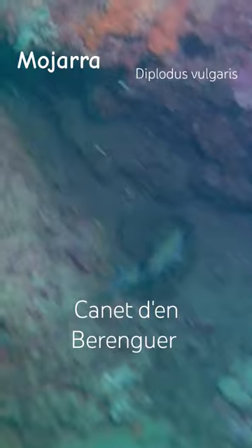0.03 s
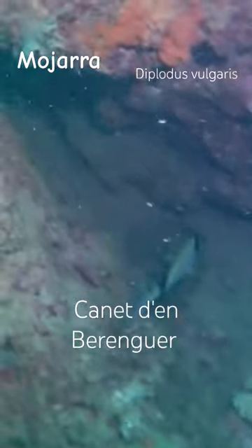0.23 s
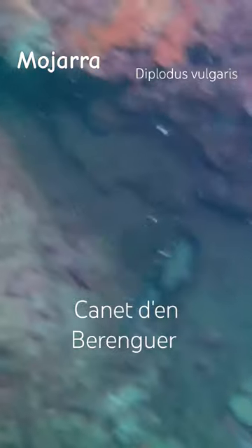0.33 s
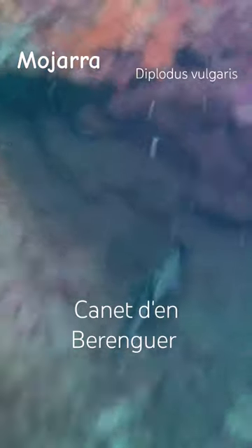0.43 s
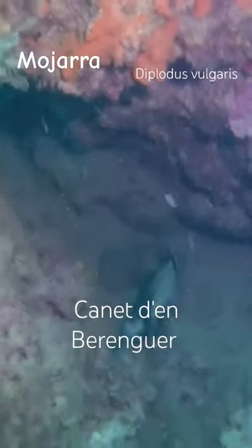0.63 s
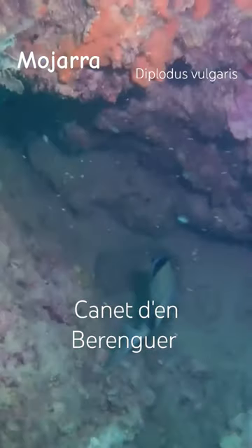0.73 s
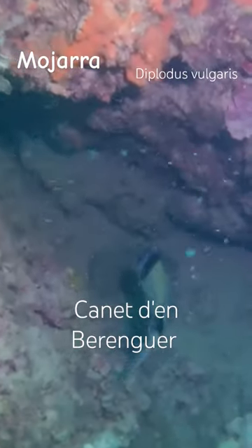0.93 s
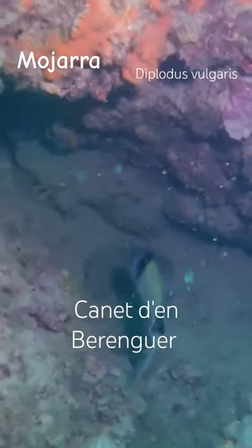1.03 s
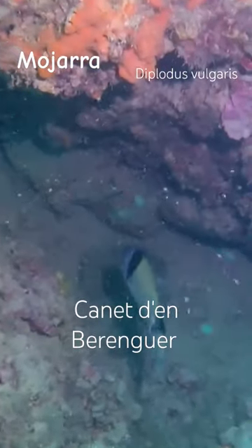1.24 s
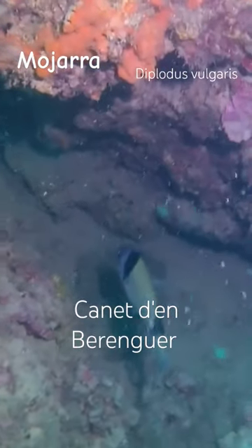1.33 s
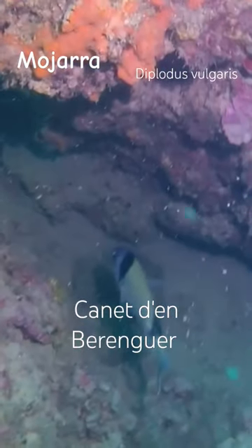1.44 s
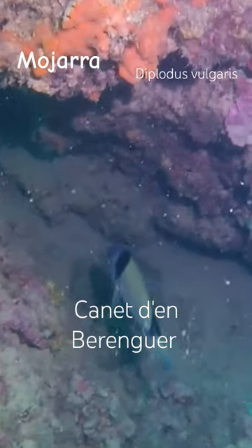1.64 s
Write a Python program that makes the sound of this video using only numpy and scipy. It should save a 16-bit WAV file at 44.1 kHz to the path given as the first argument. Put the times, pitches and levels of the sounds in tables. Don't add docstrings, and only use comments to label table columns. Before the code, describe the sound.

Muffled underwater rumble heard from inside a sealed camera housing: brief silence, a small click, strong deep wobbling hum that fades, steady water flow, then gurgles, ticks, soft bumps and faint reef crackles.

```python
import sys
import numpy as np
from scipy import signal
from scipy.fft import rfft, irfft
from scipy.io import wavfile
from scipy.ndimage import uniform_filter1d

SR = 44100
rng = np.random.default_rng(int(sys.argv[2]) if len(sys.argv) > 2 else 0)


def linear_from_db(decibels):
    return 10 ** (np.asarray(decibels, float) / 20)


def bounce(signal):
    frames = np.transpose(np.atleast_2d(signal))
    limited = np.clip(frames, -1, 1)
    pcm = np.round(limited * 32767).astype(np.int16)
    wavfile.write(sys.argv[1], SR, pcm)


N = 74970
START_S = .18362
CRACKLE_BAND_HZ = (5300, 12500)


def wobble():
    # time in seconds, level in dB.
    wobble_level = [(.185, -19), (.21, -13.5), (.3, -18), (.39, -19), (.425, -31.5), (.46, -19.5),
                    (.5, -10.5), (.55, -17.5), (.6, -13.5), (.66, -18.5), (.73, -27), (.9, -32),
                    (1.04, -42.5), (1.1, -35), (1.42, -42), (1.55, -31.5), (1.65, -40), (1.7, -33.5)]
    # time in seconds, wobble speed in Hz.
    wobble_speed = [(.18, 72), (.2, 33.5), (.21, 28.5), (.23, 29.5), (.39, 29.7), (.41, 36), (.455, 38),
                    (.48, 24), (.51, 23), (.535, 27), (.57, 30.3), (.8, 29.7), (1.7, 29.5)]
    t = np.arange(N) / SR
    moving = t > START_S + .0012
    turns = np.cumsum(along(wobble_speed, t) * moving) / SR
    return np.sqrt(2) * linear_from_db(along(wobble_level, t)) * np.sin(2 * np.pi * turns)


def bumps():
    # time of the peak in seconds, peak in dB, width in seconds (negative for a pull).
    bump_rows = [
        (0.5797, -21, -.0007),
        (.5812, -25, .0008),
        (.584, -28, -.001),
        (0.5873, -23, .0007),
        (1.3872, -22, .0015),
        (1.4104, -13.5, .0011),
        (1.2, -26, -.003),
    ]
    out, t = np.zeros(N), np.arange(N) / SR
    for s, db, width in bump_rows:
        u = (t - s) / width
        sharpness = np.where(u < 0, 3., 1.)
        out += np.sign(width) * linear_from_db(db) * np.exp(-sharpness * u ** 2)
    return out


def low_rings():
    # start in seconds, peak in dB, pitch in Hz, twice the time to fade by 30 dB in seconds.
    ring_rows = [
        (0.191, -37, 131, 0.19),
        (0.5751, -26, 185, 0.05),
        (1.042, -40.5, 149.7, 0.35),
        (1.14, -35.5, 175, 0.16),
        (1.228, -30, 135, 0.059),
        (1.291, -39, 160.2, 1),
        (1.383, -45, 175.7, 0.58),
        (1.403, -25.5, 315, 0.046),
        (1.57, -42.5, 122, 0.57),
        (1.61, -35.5, 275.4, 0.22),
    ]
    out = np.zeros(N)
    for s, db, hz, t60 in ring_rows:
        add(out, s, ring(db, hz, t60 / 2, rise_s=0.01, glide=0.011, rough=0.32, hold=1.45))
    return out


def gurgles():
    # start in seconds, peak in dB, pitch in Hz, length in seconds.
    gurgle_rows = [(0.217, -34, 732, 0.015), (0.264, -36.5, 753, 0.033), (.512, -34, 714, 0.012),
                   (.584, -24.5, 680, 0.0095), (0.606, -35.5, 775, 0.013), (0.779, -28, 750, 0.032),
                   (0.797, -21.5, 750, 0.023), (0.968, -39.5, 753, .025), (1.382, -31, 645, 0.012),
                   (1.413, -31, 750, 0.014), (1.426, -24, 724, 0.014), (1.437, -27, 847, 0.011),
                   (1.4905, -23, 778, 0.017), (1.506, -30.5, 830, 0.047), (1.604, -31, 820, 0.0086),
                   (1.666, -39, 744, 0.017), (1.682, -37, 778, 0.028), (0.718, -49, 1570, 0.0072)]
    out = np.zeros(N)
    for s, db, hz, length in gurgle_rows:
        add(out, s, ring(db, hz, length, rise_s=0.0017, glide=0.019, rough=0.2, hold=2.28))
    return out


def rising_bubbles():
    # start in seconds, peak in dB, pitch in Hz, length in seconds, glide as a share of pitch.
    bubble_rows = [(1.4385, -35.5, 1150, 0.021, .09), (1.502, -45, 1420, .036, .02),
                   (1.6, -35, 600, .012, .1), (1.414, -33, 900, .01, 0.13),
                   (.219, -34.5, 1150, 0.0087, .05), (.5781, -23.5, 458, 0.023, .01),
                   (1.6865, -42, 5730, .0065, 0.0084), (.944, -45.5, 2050, .014, .03),
                   (.755, -33, 160, .15, 0.13), (.952, -50, 1180, .012, .04),
                   (0.29, -49.5, 4450, 0.0037, .02)]
    out = np.zeros(N)
    for s, db, hz, length, glide in bubble_rows:
        add(out, s, ring(db, hz, length, rise_s=0.00107, glide=glide, rough=0.27, hold=2.3))
    return out


def ticks():
    # start in seconds, peak in dB, pitch in Hz.
    tick_rows = [(.585, -40, 1660), (.7366, -45, 2384), (.7948, -16, 2790), (.81, -38, 2270),
                 (.882, -40.5, 2470), (.906, -45, 2324), (.952, -39, 2325), (1.008, -38, 2650),
                 (1.022, -39, 2320), (1.057, -42, 2300), (1.083, -44, 2500), (1.093, -41.5, 2620),
                 (1.165, -36.5, 2380), (1.24, -39.5, 2396), (1.31, -43, 2390), (1.409, -40, 2690),
                 (1.415, -39, 3770), (1.426, -29, 2550), (1.438, -28, 2660), (1.438, -31.5, 3600),
                 (1.453, -33, 2610), (1.4895, -25.5, 1955), (1.4895, -39, 2680), (1.503, -36.5, 2620),
                 (1.503, -38.5, 3710), (1.53, -43, 2270), (1.652, -47, 2350), (1.687, -39, 1700)]
    return cracks(tick_rows, length=0.0069, rough=.48, glide=.04,
                  burst_s=0.0016, burst_db=-8.5, band=(1800, 2900), near_db=-31)


def rushes():
    # centre in seconds, spread in seconds, level in dB, centre in Hz, width in Hz.
    rush_rows = [(.221, 0.0028, -44, 1000, 800), (0.22, 0.0037, -47.5, 2400, 3600),
                 (0.502, 0.021, -49.5, 3300, 3300), (.495, 0.043, -50.5, 1870, 1800),
                 (.5, 0.023, -49, 1640, 220), (0.508, 0.027, -50.5, 2400, 310),
                 (0.517, 0.025, -52, 1100, 120), (0.477, 0.021, -41, 770, 220),
                 (0.62, 0.025, -61, 1000, 1600), (0.604, 0.015, -56, 2600, 2900),
                 (1.388, 0.0029, -46.5, 2600, 1200), (1.43, 0.024, -38.5, 500, 800),
                 (.425, 0.019, -47, 860, 280), (1.405, 0.023, -36.5, 300, 420),
                 (0.971, 0.028, -38, 107, 74), (0.639, 0.023, -47.5, 160, 230)]
    out, t = np.zeros(N), np.arange(N) / SR
    f = np.fft.rfftfreq(N, 1 / SR)
    for s, spread_s, db, hz, width in rush_rows:
        band = 1 + (2 * (f - hz) / width) ** 6
        noise = irfft(rfft(rng.standard_normal(N)) / band, N)
        swell = np.exp(-.5 * ((t - s) / spread_s) ** 2)
        out += linear_from_db(db) * evened(noise) * swell
    return out


def snaps():
    # start in seconds, peak in dB, pitch in Hz.
    snap_rows = [(.201, -47, 6900), (.247, -45.5, 6400), (.309, -42.5, 6900), (.317, -48, 5800),
                 (.594, -46.5, 6000), (.627, -43, 6700), (.708, -40.5, 7000), (.795, -45, 5830),
                 (.594, -56, 12000), (1.317, -46, 7050), (1.405, -45.5, 5800), (1.439, -48, 5800),
                 (1.483, -53, 6900), (1.503, -41, 5800), (1.514, -56, 6870), (1.573, -47, 7350),
                 (1.581, -63, 10000), (1.6, -40.5, 6820), (1.6, -58, 12300), (1.647, -40, 6930),
                 (1.658, -41, 6800)]
    return cracks(snap_rows, length=0.0052, rough=0.29, glide=-.02,
                  burst_s=0.001, burst_db=-9.0, band=CRACKLE_BAND_HZ, near_db=-46.0)


def thin_crackles():
    # start in seconds, peak in dB, pitch in Hz.
    crackle_rows = [(0.2267, -50, 5700), (0.4509, -61, 5580), (0.4509, -53, 5670), (0.5277, -49, 6790),
                    (0.6694, -50, 6220), (0.7324, -57, 5680), (0.7394, -49, 5820), (0.854, -52, 6860),
                    (0.8959, -53, 6220), (0.9028, -53, 7280), (0.9264, -58, 6610), (0.9557, -52, 7020),
                    (0.9674, -49, 6780), (0.9782, -46, 6170), (0.9874, -48, 5840), (1.0004, -49, 6590),
                    (1.0184, -53, 7030), (1.0484, -55, 6930), (1.0755, -48, 5700), (1.1224, -54, 5790),
                    (1.1538, -52.5, 6810), (1.1877, -54, 5500), (1.2271, -52, 5720), (1.2441, -51, 5750),
                    (1.2584, -54, 8360), (1.2654, -55, 6110), (1.2814, -54, 5810), (1.3274, -49, 7060),
                    (1.3848, -48, 5760), (1.4644, -52, 7010)]
    return linear_from_db(-1.5) * cracks(crackle_rows, length=0.0036, rough=0.45, glide=0,
                              burst_s=0.00087, burst_db=-2.0, band=CRACKLE_BAND_HZ, near_db=-70)


def flow():
    # time in seconds, level in dB.
    flow_level = [
        (.19, -37.5),
        (.35, -41.5),
        (.5, -36),
        (.7, -40.5),
        (1.3, -39.5),
        (1.42, -39),
        (1.7, -38.5),
    ]
    flicker_db = 1.5 * evened(uniform_filter1d(rng.standard_normal(N), 250))
    white = evened(rng.standard_normal(N) * linear_from_db(flicker_db))

    grain_size = linear_from_db(3.5 * np.minimum(rng.exponential(1, N), 3.5))
    hits = rng.random(N) < 500 / SR
    grit = rng.standard_normal(N) * grain_size * hits
    grit = signal.lfilter([1, -.6], [1], evened(grit))

    hz, t, z = signal.stft(white + linear_from_db(-5.5) * grit, SR, nperseg=512, noverlap=384)
    patches = rng.standard_normal(z.shape[::-1]).T
    patches = evened(uniform_filter1d(uniform_filter1d(patches, 6, 0), 12, 1))
    patch_db = 2.5 * patches
    x = signal.istft(z * linear_from_db(patch_db), SR, nperseg=512, noverlap=384)[1][:N]
    return evened(shell(x, 34.0, SR)) * linear_from_db(along(flow_level, np.arange(N) / SR))


def cracks(events, length, rough, glide, burst_s, burst_db, band, near_db):
    out, burst, t = np.zeros(N), np.zeros(N), np.arange(900) / SR
    for s, db, hz in events:
        blur = 1 + max(near_db - db, 0) / 9.2
        add(out, s, ring(db, hz, blur * length, rise_s=0.00084 * blur, glide=glide, rough=rough, hold=1.125))
        rise = np.minimum(t / (0.00041 * blur ** 2), 1)
        puff = np.exp(-t / (blur * burst_s)) * rise
        add(burst, s, linear_from_db(db + burst_db) * rng.standard_normal(900) * puff)
    return out + shell(burst, *band)


def ring(db, hz, length, rise_s, glide, rough, hold):
    t = np.arange(0, .4, 1 / SR)
    smoothing = np.hanning(max(round(4 * SR / hz), 8))
    waver = evened(signal.oaconvolve(rng.standard_normal(len(t)), smoothing, "same"))
    glided = t + glide * (t ** 2 / length - .5 * t)
    tone = np.sin(2 * np.pi * hz * glided + rough * waver)
    rise = np.sin(np.pi / 2 * np.minimum(t / rise_s, 1)) ** 2
    fade = linear_from_db(db - 30.1 * (t / length) ** hold)
    return fade * rise * tone * (1 + .5 * rough * waver[::-1])


def housing(hz):
    # frequency in Hz, level in dB.
    broad_colour = [(40, -2), (110, -16), (300, -21.5), (1000, -29.5), (1500, -36.5), (2900, -36),
                    (3080, -43.5), (15000, -63)]
    # wall resonance in Hz, width in Hz, lift above the broad colour in dB.
    wall_rows = [(81.6, 12.8, 8.5), (135, 12.5, 10), (166, 25, 9.5), (269.3, 49, 6), (490.5, 66, 6),
                 (750, 160, 14), (882, 150, 2.5), (1180, 32, 1), (1884, 123, 6.5), (2390, 510, 5.5),
                 (3600, 1000, 2), (5800, 360, 6), (7000, 440, 9), (10860, 810, 3.5)]
    f, db = np.transpose(broad_colour)
    lift = sum(d / (1 + (2 * (hz - c) / w) ** 2) for c, w, d in wall_rows)
    return linear_from_db(np.interp(np.log(hz + 1), np.log(f), db) + lift)


def shell(x, low_hz, high_hz):
    hz = np.abs(np.fft.fftfreq(16384, 1 / SR))
    band = (1 + (low_hz / (hz + 1)) ** 4) * (1 + (hz / high_hz) ** 4)
    log_gain = np.log(housing(hz) / band + 1e-7)
    response = np.exp(np.conj(signal.hilbert(log_gain)))
    taps = np.fft.ifft(response).real[:8192]
    return signal.oaconvolve(x, taps / np.linalg.norm(taps))[:N]


def evened(x):
    return x / np.sqrt(np.mean(x ** 2) + 1e-20)


def along(points, t):
    return np.interp(t, *np.transpose(points))


def add(mix, s, sound):
    part = mix[round(s * SR):][:len(sound)]
    part += sound[:len(part)]


def scene():
    touches = bumps() + low_rings()
    water = gurgles() + rising_bubbles() + ticks() + rushes()
    crackles = snaps() + thin_crackles()
    return (wobble() + touches + water + crackles + flow())[None]


def roll_off(x):
    return signal.sosfilt(signal.butter(12, 15400, fs=SR, output="sos"), x)


def record(dry):
    click_db, click_s, edge_hz = -20.5, 0.00025, 15400
    since = np.arange(N) / SR - START_S
    click = linear_from_db(click_db) * (1 - since / click_s) * np.exp(-np.abs(since) / (2 * click_s))
    click = click * np.clip(since / .00005, 0, 1)
    fade_in = np.clip(since / 0.00074, 0, 1)
    heard = dry * fade_in + click * (since > 0)
    heard = signal.oaconvolve(heard, signal.firwin(255, edge_hz, fs=SR)[None], "same")
    return roll_off(heard)


dry = scene()
out = record(dry)
bounce(out)
```